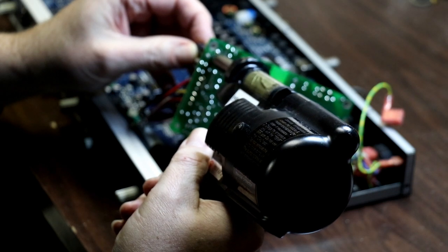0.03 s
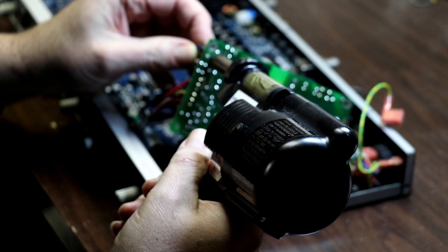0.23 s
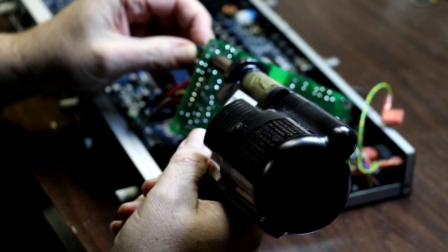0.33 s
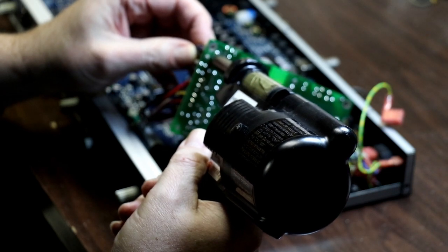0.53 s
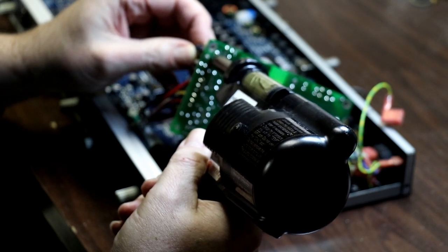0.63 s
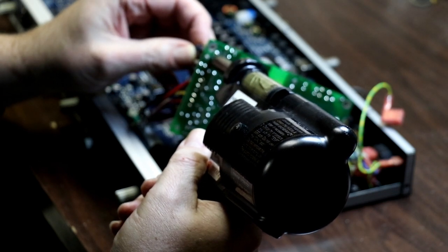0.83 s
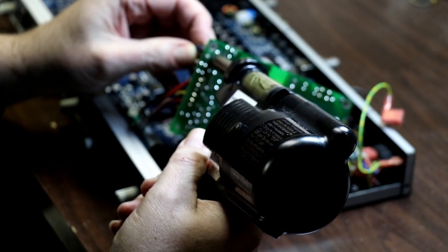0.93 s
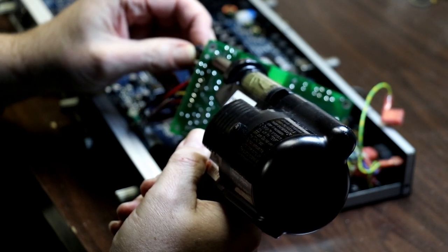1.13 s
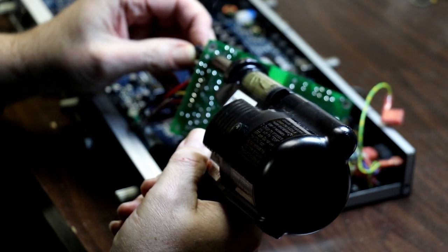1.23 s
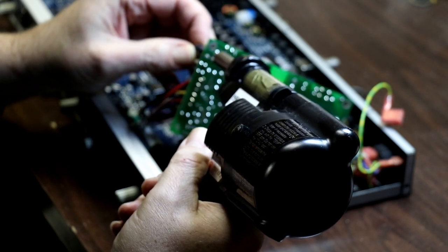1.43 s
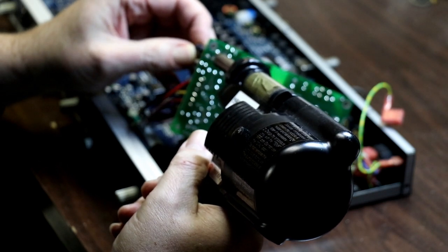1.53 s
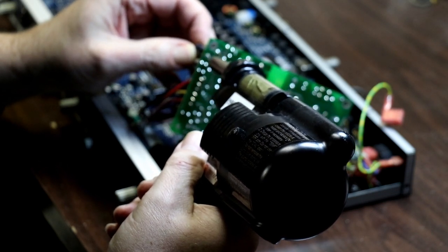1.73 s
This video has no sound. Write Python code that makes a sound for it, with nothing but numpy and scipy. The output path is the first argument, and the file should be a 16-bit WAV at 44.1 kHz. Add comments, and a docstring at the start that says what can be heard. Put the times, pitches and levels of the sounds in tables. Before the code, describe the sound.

Harsh steady buzz of a small electric vacuum pump, with trigger click and hissing air, in a quiet room

```python
"""A fan hums in a quiet room; then the trigger of a hand-held desoldering gun clicks over a workbench.
Its small diaphragm pump spins up, buzzes steadily for a second while air hisses through the nozzle, then
runs down. The buzz is a stack of overtones of the stroke rate, coloured by the housing; rattle, hiss and
clicks are shaped noise with a short room echo; the fan is a wavering sine over room noise."""
import sys
import numpy as np
from scipy import signal
from scipy.fft import rfft, irfft
from scipy.io import wavfile

SR = 44100
rng = np.random.default_rng(int(sys.argv[2]) if len(sys.argv) > 2 else 0)


def dump(signal):
    """Clip the signal to [-1, 1] and save it as 16-bit WAV at the path in sys.argv[1]."""
    limited = np.clip(np.atleast_2d(signal).T, -1, 1)
    pcm = np.round(limited * 32767).astype(np.int16)
    wavfile.write(sys.argv[1], SR, pcm)


N = 79380

# fan hum over time: start_s, level_db
FAN_LEVEL = [(0, -43), (.07, -46), (.15, -41), (1.3, -43), (1.5, -53), (1.7, -41), (1.8, -44)]
# room noise spectrum, relative: freq_hz, density_db (per Hz)
ROOM_SPECTRUM = [(25, -12), (70, -13.5), (120, -1.5), (240, -8), (370, -6), (600, -16.5), (1050, -22.5),
                 (1280, -18), (2600, -31), (5000, -36), (7000, -32), (15500, -39)]
# stereo image: freq_hz, pump_likeness (-1 to 1), room_likeness (-1 to 1), left_minus_right_db (pump only)
STEREO_IMAGE = [(99, .99, 0.99, 8), (402, 0.46, 0.93, -13), (1380, 0.083, 0.15, -0.5), (3100, 0.36, 0, -1),
                (8100, 0.86, 0, -5), (15000, 0.63, .05, -2)]
# switch clicks: start_s, level_db (at the onset)
TRIGGER_CLICKS = [(.1814, -27), (.1892, -33)]
# click spectrum, relative: freq_hz, density_db (per Hz)
CLICK_SPECTRUM = [(2200, -16), (3600, 0), (4800, -14), (7500, -8), (15000, -14)]
# pump run: start_s, stroke_rate_hz, buzz_db (before the speed weighting in buzz), air_db
PUMP_RUN = [(.19, 40.97, -40, -44), (0.2083, 52.23, -40.5, -36), (0.2104, 53.62, -27, -39.5),
            (.238, 72.86, -21.5, -33.5), (0.257, 81.47, -21, -32.5), (0.275, 89.11, -18, -30),
            (.294, 95.2, -19, -30), (0.329, 97.33, -19.5, -33), (.37, 98.1, -18, -34),
            (.6, 98.45, -18, -34), (1.0, 98.55, -18, -34), (1.3, 98.9, -18.5, -35),
            (1.396, 98.83, -19, -33), (1.43, 75.67, -27, -37.5), (1.455, 60.2, -32, -42),
            (1.466, 53, -36, -47), (1.483, 44, -42.5, -46.5), (1.532, 24.7, -51, -59)]
# housing response, one row per multiple of RUN_HZ: level_db, left_minus_right_db
HOUSING_ORDERS = [(-40, 0), (-37, -1), (-37, 0), (-29, -2), (-31, 1), (-31, -2), (-24, 5), (-32, 1),
                  (-36, -3), (-34, -4), (-36, -3), (-41, -1), (-32, -5), (-29, -1), (-43, 1), (-32, -4),
                  (-42, -5), (-35, 1), (-36, -8), (-34, -8), (-32, 0), (-35, -6), (-45, -8), (-35, 2),
                  (-33, -7), (-52, -11), (-49, -5), (-40, -1), (-39, -7), (-44, -1), (-45, 3), (-49, -6),
                  (-49, -7), (-51, 2)]
# slow change of colour through the run: freq_hz, slope_db_per_s
COLOUR_SHIFT = [(394, 2), (493, -6), (690, -1), (1084, 3), (1183, -8), (1282, 15), (1380, -2), (1676, 7),
                (1775, -5), (1970, 1), (2168, -4), (2267, 12), (2366, -8), (2465, -2)]
# valve and housing rattle spectrum, relative: freq_hz, density_db (per Hz)
RATTLE_SPECTRUM = [(60, -35), (300, -15), (1050, -2.5), (2000, 2.5), (2600, -4.5), (2950, 0), (3500, -17)]
# housing modes: freq_hz, width_hz, ring_db (against the buzz, before loosening)
HOUSING_MODES = [(672, 45, -30), (912, 25, -31), (1297, 25, -30), (1855, 50, -35)]
# nozzle hiss spectrum, relative: freq_hz, density_db (per Hz)
AIR_SPECTRUM = [(2120, -8), (3700, -7), (4620, -3), (5420, 2), (6300, -3.5), (7770, 2), (8890, -4.5),
                (10000, -1), (12800, -17.5), (15500, -36)]

FAN_HZ, FAN_WAVER_DB, ROOM_DB = 192.5, 1., -46
CLICK_T60_S = .02
RUN_HZ, RUN_DB, RUN_MID_S = 98.6, -18, .9   # steady speed, buzz reference level, middle of the run
TOP_ORDERS_DB, TOP_ORDERS_LEAN_DB = -55.5, -4   # faint overtones above the housing table
WOBBLE_HZ, WAVER_DB = .08, .8   # spread of the speed and of each overtone's level
SLOW_WAVER_DB = 1.3   # the upper overtones also come and go slowly
LEFT_LAG_S = 2e-5   # the pump reaches the left side later
KNEE_HZ, LATE_S = 690, .00127   # above the knee a stroke arrives later
IN_STEP = 25   # overtones past this count fall out of step
EVEN_LAG = .1   # turns by which the low even overtones trail
PASS_DB = 6   # an overtone swells as it sweeps through a housing mode
# a slower rotation puts side lines round each overtone: turns per stroke, level, lift on a mode
BEARING_ORDER, BEARING_DB, BEARING_LIFT_DB = .212, -26, 17
RATTLE_DB, RATTLE_GATE = -11, .063   # level against the buzz, pulse depth 0-1
LOOSE_DB, RING_LOOSE_DB = 6.5, 13   # extra off speed: all the rattle, and the ringing on top of that
AIR_GATE, AIR_SWAY, AIR_FLICKER_DB = .14, .04, 2   # depth per stroke, per slower turn, flicker spread
ECHO_DB, ROOM_T60_S, WALL_CUT_HZ = -14, .3, 5000
CUTOFF_HZ = 15950


def from_db(db):
    """Decibels to gain."""
    return 10 ** (np.asarray(db) / 20)


def rms_one(x):
    """Scale to unit rms."""
    return x / np.sqrt(np.mean(x ** 2) + 1e-20)


def in_time(rows):
    """Table columns as curves over time."""
    s, *columns = np.transpose(rows)
    return [np.interp(np.arange(N) / SR, s, c) for c in columns]


def at_hz(points, hz, order=1):
    """Read a column of a spectrum table on a log-frequency axis."""
    points = np.array(points)
    return np.interp(np.log(np.maximum(hz, 1)), np.log(points[:, 0]), points[:, order])


def drift(rate):
    """Random wandering of spread 1: noise low-passed near rate (Hz), made at every 40th sample."""
    r = np.exp(-80 * np.pi * rate / SR)
    noise = rng.standard_normal(N // 40 + 2002)
    slow = signal.lfilter([1], [1, -2 * r, r * r], noise)[2000:]   # drop the filter's settling
    return np.interp(np.arange(N) / 40, np.arange(len(slow)), rms_one(slow))


def sides(db):
    """Left and right gains for a left-minus-right difference."""
    return from_db(np.multiply.outer([.5, -.5], db))


def coloured(spectrum, order):
    """Stereo noise of rms 1; order picks the likeness column, 1 pump (also leaning and lagging) or 2 room."""
    hz = np.fft.rfftfreq(N, 1 / SR)
    mid, side = rfft(rng.standard_normal((2, N)))
    alike = np.clip(at_hz(STEREO_IMAGE, hz, order=order), -1, 1)
    pair = np.sqrt(1 + alike) * mid + np.sqrt(1 - alike) * side * np.array([[1], [-1]])
    if order == 1:
        lag_s = np.array([[LEFT_LAG_S], [0]])
        pair = pair * sides(at_hz(STEREO_IMAGE, hz, order=3)) * np.exp(-2j * np.pi * hz * lag_s)
    return rms_one(irfft(pair * from_db(at_hz(spectrum, hz)), N))


def fan():
    """A low sine hum that wavers in pitch and level."""
    level_db, = in_time(FAN_LEVEL)
    turns = np.cumsum(FAN_HZ + drift(5)) / SR
    return np.sqrt(2) * from_db(level_db + FAN_WAVER_DB * drift(2.3)) * np.sin(2 * np.pi * turns)


def room_noise():
    """Steady broadband noise of the quiet room."""
    return from_db(ROOM_DB) * coloured(ROOM_SPECTRUM, order=2)


def trigger():
    """Short bright clicks of the switch: noise bursts with exponential decay."""
    t, shape = np.arange(N) / SR, 0
    for s, db in TRIGGER_CLICKS:
        shape = shape + (t >= s) * from_db(db - 60 * np.maximum(t - s, 0) / CLICK_T60_S)
    return shape * coloured(CLICK_SPECTRUM, order=1)


def looseness(speed_hz):
    """How far the pump is below running speed, 0-1."""
    return np.clip(4 * (1 - speed_hz / RUN_HZ), 0, 1)


def housing():
    """The housing's level and left-right lean by frequency."""
    rows = list(HOUSING_ORDERS) + [(TOP_ORDERS_DB, TOP_ORDERS_LEAN_DB)]
    return [(k * RUN_HZ, db, lean_db) for k, (db, lean_db) in enumerate(rows, 1)]


def on_mode(hz, modes):
    """Closeness to the modes: each adds a resonance curve that peaks at 1."""
    return sum(1 / (1 + ((hz - mode) / width) ** 2) for mode, width, _ in modes)


def buzz(speed_hz, turns, count=58):
    """One stroke per turn, built from its overtones, each coloured by the housing at its present pitch."""
    table = housing()
    since_s = np.clip(np.arange(N) / SR - RUN_MID_S, -.55, .5)
    off_speed = looseness(speed_hz)
    out = np.zeros((2, N))
    for k, chance in enumerate(rng.random(count), 1):
        hz = k * speed_hz
        db = at_hz(table, hz) + at_hz(COLOUR_SHIFT, hz) * since_s + WAVER_DB * drift(15.6)
        if k > IN_STEP / 2:
            db = db + SLOW_WAVER_DB * drift(5)

        # lag in turns of this overtone; off speed the lower ones also slip out of step
        lag = np.array([[LEFT_LAG_S], [0]]) * hz + LATE_S * np.maximum(hz - KNEE_HZ, 0)
        lag = lag + chance * np.maximum(k > IN_STEP, off_speed) + EVEN_LAG * (k in (2, 4))
        # three of the modes turn the phase over as the overtone passes
        flip = sum(np.arctan2(2, HOUSING_MODES[m][0] - hz) for m in (0, 2, 3))
        phase = 2 * np.pi * (k * turns - lag + 1 / 3) - flip

        sweeping = speed_hz < RUN_HZ - 1
        wave = from_db(PASS_DB * sweeping * on_mode(hz, HOUSING_MODES)) * np.cos(phase)
        if k <= IN_STEP:
            for order in (-BEARING_ORDER, BEARING_ORDER):
                lift = on_mode(hz + order * speed_hz, HOUSING_MODES[1:3])
                line = np.cos(phase + 2 * np.pi * (order * turns + chance))
                wave += from_db(BEARING_DB + BEARING_LIFT_DB * lift) * line
        out += from_db(db) * sides(at_hz(table, hz, order=2)) * wave
    # at low speed the overtones lie closer together, so each is scaled down
    return out * np.sqrt(2 * speed_hz / RUN_HZ) / from_db(RUN_DB)


def rattle(speed_hz, turns):
    """Noise pulsing with the strokes, part of it ringing in the housing modes; looser off speed."""
    noise = coloured(RATTLE_SPECTRUM, order=1) * (1 + RATTLE_GATE * np.cos(2 * np.pi * turns))
    loose = looseness(speed_hz)
    out = from_db(RATTLE_DB) * noise
    for hz, width_hz, db in HOUSING_MODES:
        r = np.exp(-np.pi * width_hz / SR)
        resonator = [1, -2 * r * np.cos(2 * np.pi * hz / SR), r * r]
        ring = rms_one(signal.lfilter([1, 0, -1], resonator, noise))
        out = out + from_db(db + RING_LOOSE_DB * loose) * ring
    return out * from_db(LOOSE_DB * loose)


def air(turns):
    """Nozzle hiss, puffing once per turn, swaying with the slower rotation and flickering fast."""
    sway = 1 + AIR_SWAY * np.cos(2 * np.pi * BEARING_ORDER * turns)
    puffs = 1 + AIR_GATE * np.cos(2 * np.pi * turns)
    return coloured(AIR_SPECTRUM, order=1) * sway * puffs * from_db(AIR_FLICKER_DB * drift(270))


def room_echo(x):
    """Six feedback delays a side, duller on every round."""
    out, dull = np.zeros((2, N)), np.exp(-2 * np.pi * WALL_CUT_HZ / SR)
    for k, lag in enumerate((rng.uniform(.015, .04, 12) * SR).astype(int)):
        loop, gain, state = x.copy(), from_db(-60 * lag / SR / ROOM_T60_S), [0.]
        for i in range(lag, N, lag):
            back, state = signal.lfilter([gain * (1 - dull)], [1, -dull], loop[i - lag:i], zi=state)
            loop[i:i + lag] += back[:N - i]
        out[k % 2] += (loop - x) * (-1) ** (k // 2)   # echoes only, in alternating polarity
    return out


def scene():
    """Fan and room noise, then the gun with an echo of its clicks, rattle and hiss."""
    first, last = PUMP_RUN[0], PUMP_RUN[-1]
    fade_in, fade_out = (first[0] - .008, first[1], -70, -50), (last[0] + .074, 20, -75, -80)
    speed_hz, buzz_db, air_db = in_time([fade_in] + list(PUMP_RUN) + [fade_out])
    on = np.arange(N) / SR > TRIGGER_CLICKS[0][0]
    speed_hz = speed_hz + WOBBLE_HZ * drift(7.8)
    turns = np.cumsum(speed_hz) / SR

    background = fan() + room_noise()
    noisy = trigger() + from_db(buzz_db) * rattle(speed_hz, turns) + on * from_db(air_db) * air(turns)
    gun = from_db(buzz_db) * buzz(speed_hz, turns) + noisy
    return background + gun + from_db(ECHO_DB) * room_echo(noisy.mean(axis=0))


def record(dry):
    """A steep low-pass, 80 dB down from the cutoff upwards."""
    return signal.sosfilt(signal.cheby2(16, 80, CUTOFF_HZ, fs=SR, output="sos"), dry)


dry = scene()
out = record(dry)
dump(out)
```